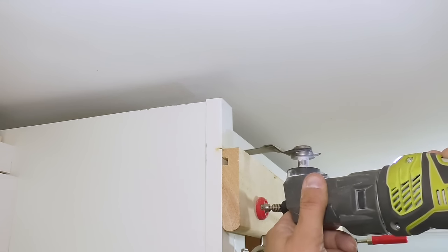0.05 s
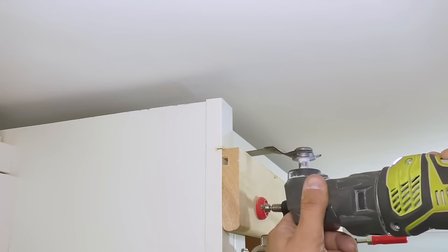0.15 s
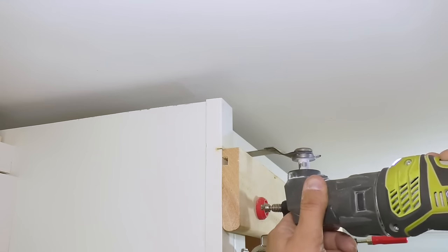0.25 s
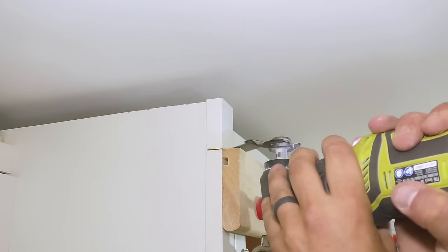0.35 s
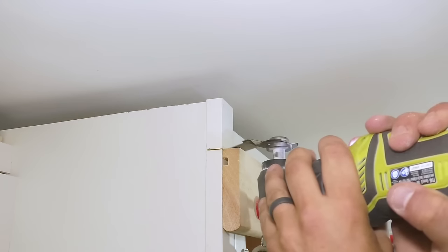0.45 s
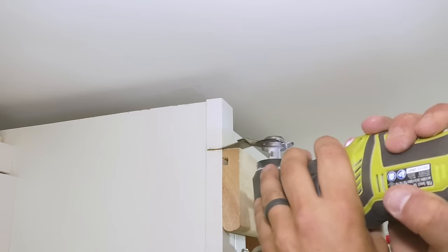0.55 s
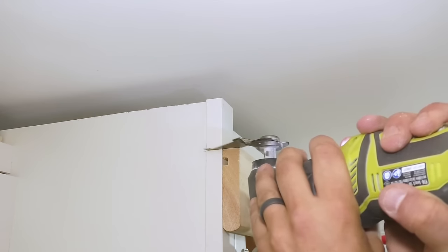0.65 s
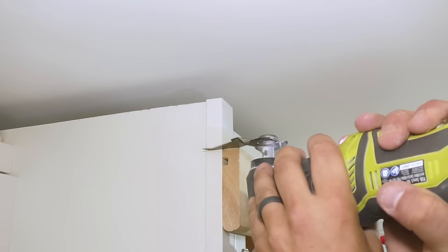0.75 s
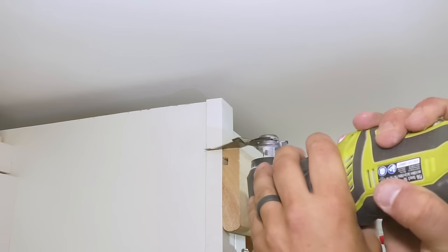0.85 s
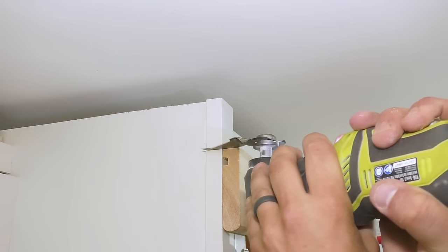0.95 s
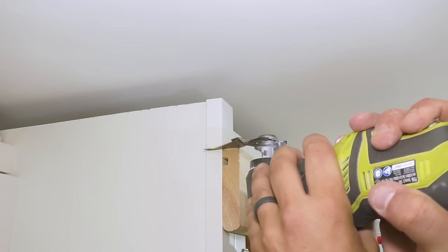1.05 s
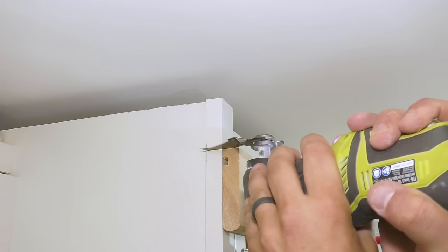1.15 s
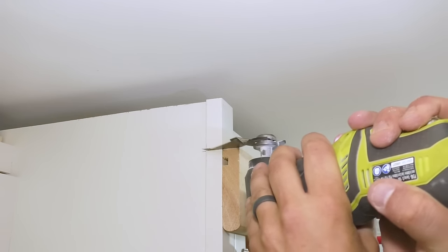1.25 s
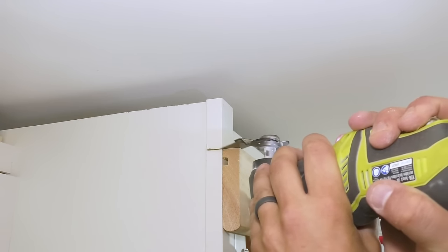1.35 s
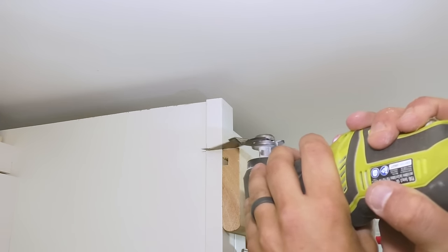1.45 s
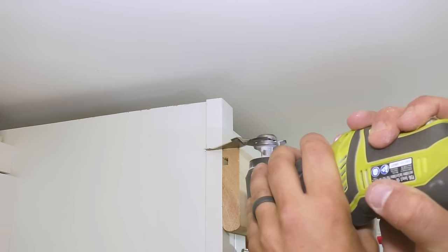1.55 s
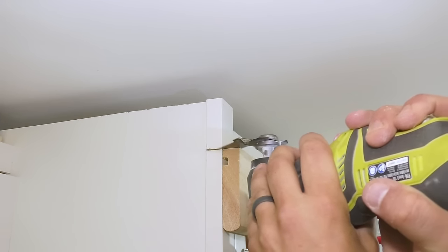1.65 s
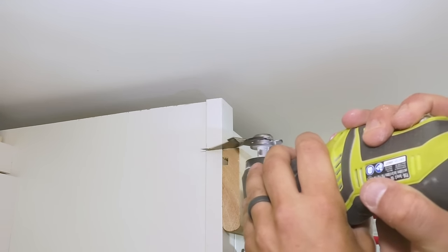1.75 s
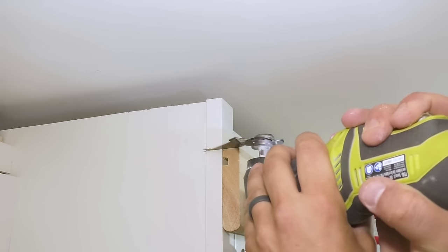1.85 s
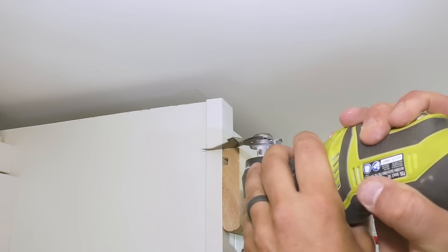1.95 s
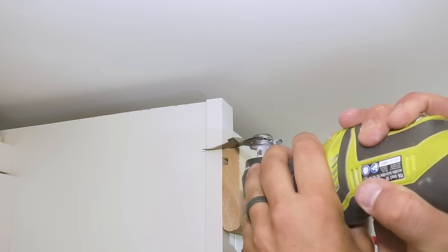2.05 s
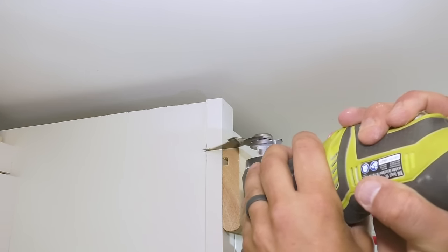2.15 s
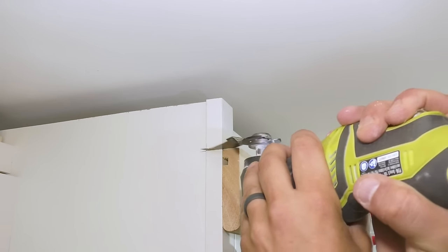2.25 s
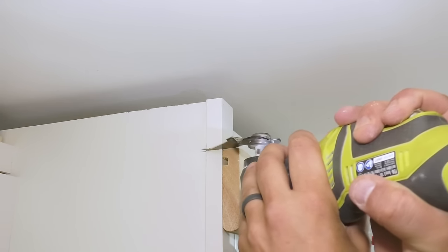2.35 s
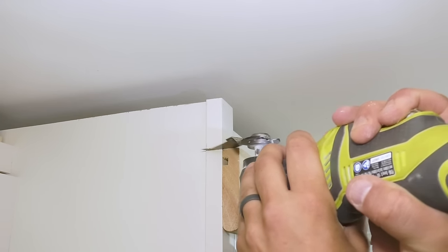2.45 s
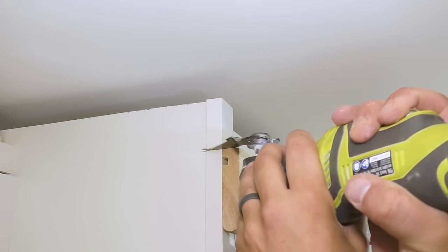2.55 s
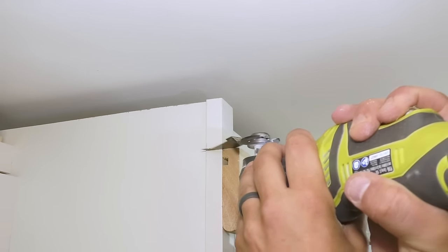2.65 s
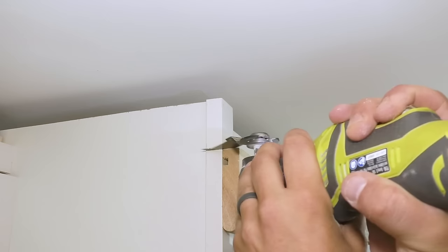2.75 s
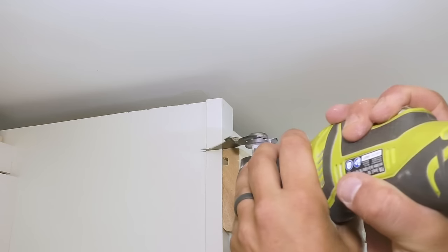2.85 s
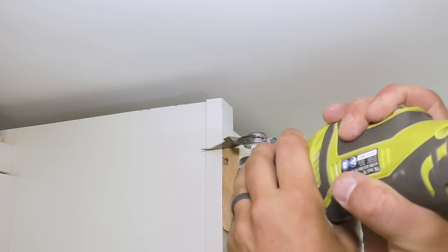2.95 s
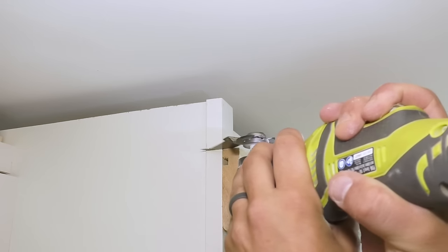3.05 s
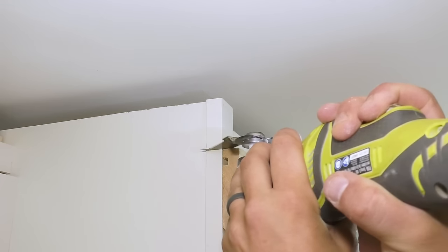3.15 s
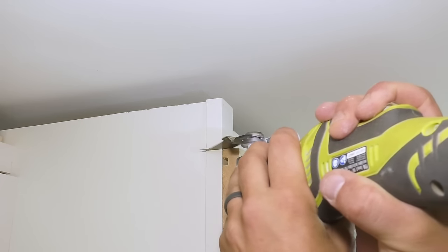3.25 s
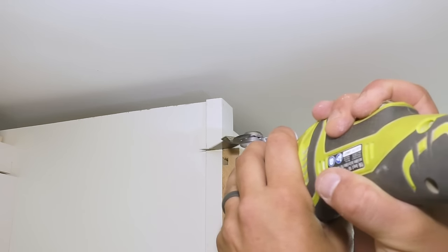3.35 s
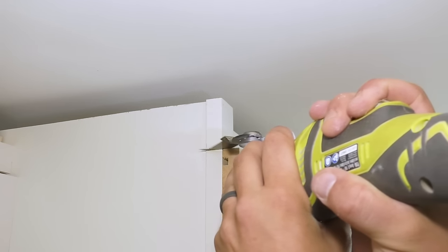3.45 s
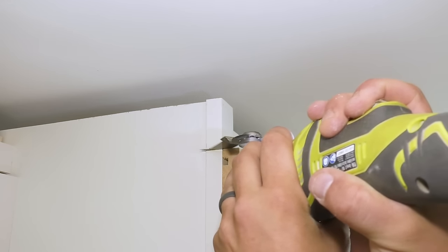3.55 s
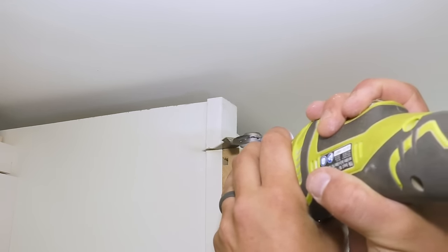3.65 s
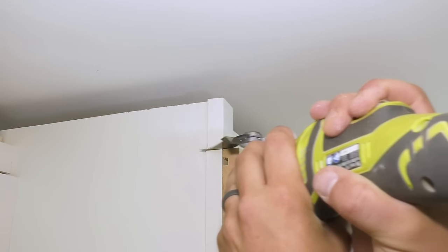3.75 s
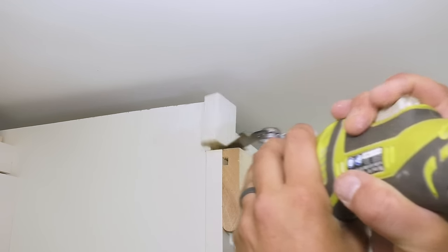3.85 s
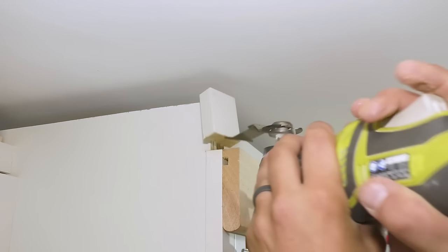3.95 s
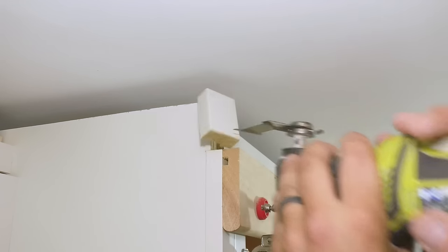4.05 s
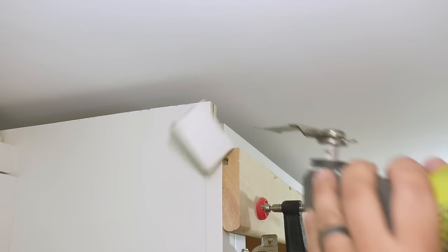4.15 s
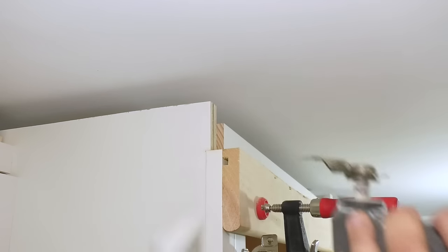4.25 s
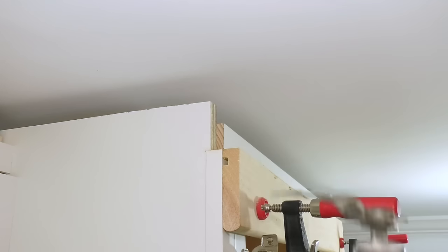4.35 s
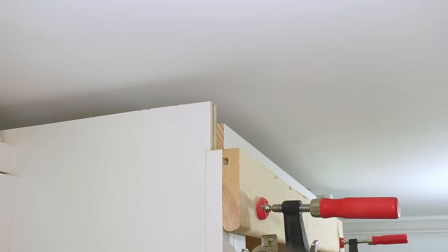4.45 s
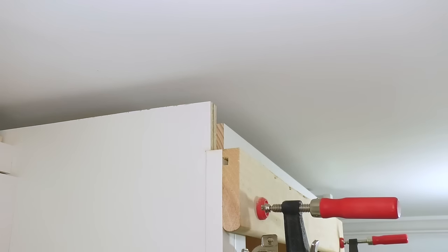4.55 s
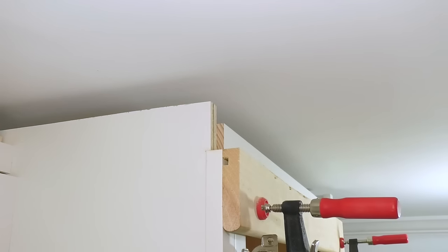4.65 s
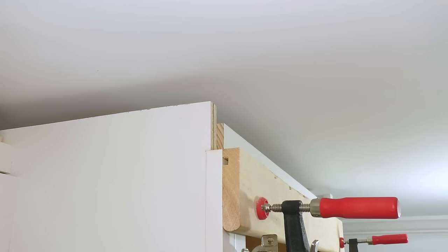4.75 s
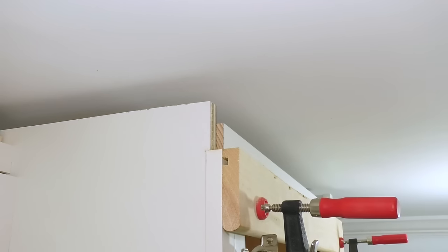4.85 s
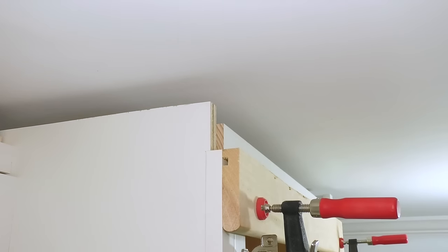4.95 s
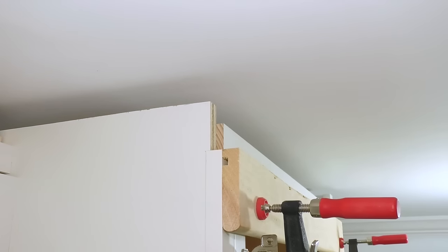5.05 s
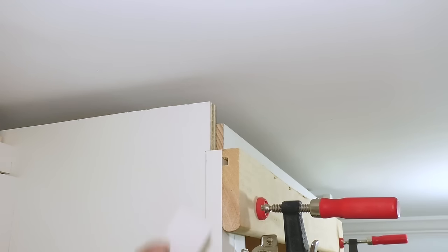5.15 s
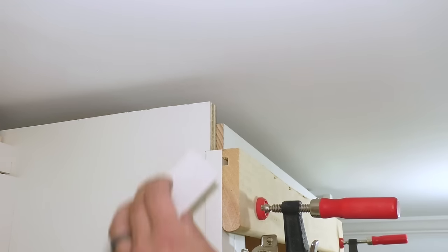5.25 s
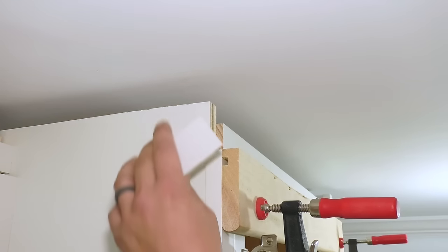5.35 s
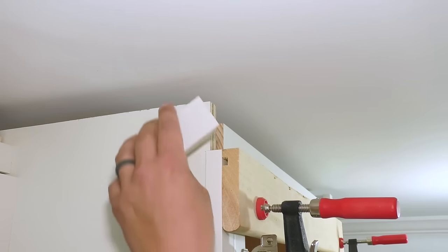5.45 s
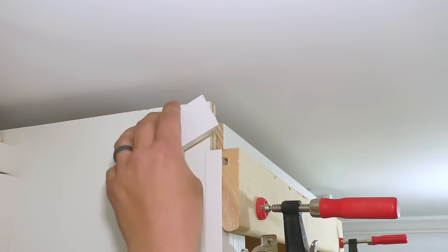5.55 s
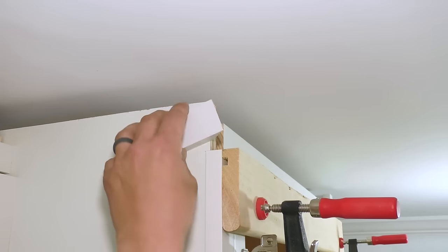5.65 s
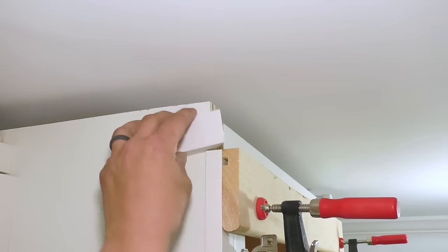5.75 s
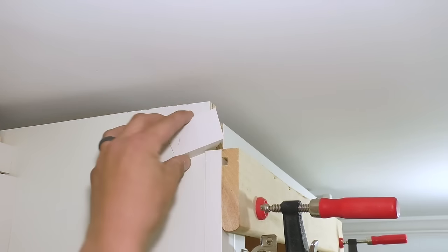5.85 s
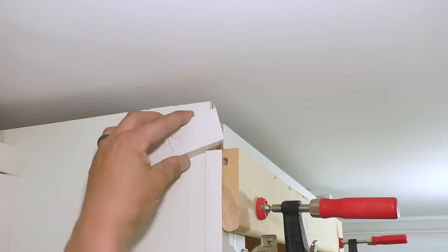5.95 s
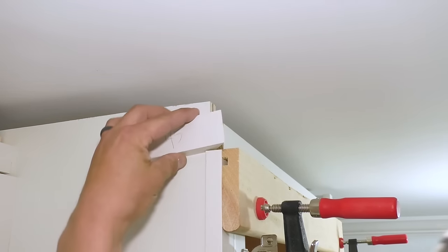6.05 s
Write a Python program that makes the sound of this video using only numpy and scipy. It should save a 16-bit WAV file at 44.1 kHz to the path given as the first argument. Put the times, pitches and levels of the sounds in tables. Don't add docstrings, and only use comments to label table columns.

```python
import sys
import numpy as np
from scipy import signal
from scipy.fft import rfft, irfft
from scipy.io import wavfile
from scipy.ndimage import uniform_filter1d

SR = 44100
rng = np.random.default_rng(int(sys.argv[2]) if len(sys.argv) > 2 else 0)


def master(y):
    cut = np.clip(np.atleast_2d(y).T, -1, 1)
    pcm = np.round(cut * 32767)
    wavfile.write(sys.argv[1], SR, pcm.astype(np.int16))


def volts(x):
    e = np.asarray(x, float) / 20
    return 10 ** e


N = 268995
TIME = np.arange(N) / SR
FULL_CUT_S, LAYING_S = .342, 4.994
STOP_S, SLOW_S, FREE_S = 3.992, 3.925, 3.88
ENTRY = TIME < FULL_CUT_S


def unit(x):
    return x / np.sqrt(np.mean(x ** 2))


def curves(spans):
    s, *columns = np.transpose(np.concatenate(spans))
    return [np.interp(TIME, s, c) for c in columns]


def band(x, lo_hz, hi_hz, order=2):
    return signal.sosfilt(signal.butter(order, [lo_hz, min(hi_hz, .45 * SR)], "band", fs=SR, output="sos"), x)


def hiss(lo_hz, hi_hz):
    return unit(band(rng.standard_normal(N), lo_hz, hi_hz))


def colour(x, points):
    hz, db = np.transpose(points)
    f = np.arange(N // 2 + 1) * SR / N + 1
    return irfft(rfft(x) * volts(np.interp(np.log(f), np.log(hz), db)), N)


def walk(rate):
    k = int(SR / rate)
    levels = rng.standard_normal(N // 100)[:N // k + 1]
    return uniform_filter1d(uniform_filter1d(np.repeat(levels, k), k), k)[:N]


def by_depth(levels, depth):
    return np.interp(depth, np.arange(len(levels)), levels)


def peak(f, centre, width):
    return 1 / (1 + (2 * (f - centre) / width) ** 2)


# centre in Hz, decay by 60 dB in seconds.
DECAY = [(250, 0.47), (1000, 0.44), (3500, 0.43), (11000, 0.3)]


def room(x, wet_db):
    t = TIME[:SR // 2]
    tail = sum(band(rng.standard_normal(len(t)), hz / 2, hz * 2) * 1000. ** (-t / t60) for hz, t60 in DECAY)
    tail = tail * np.clip(t / 0.0073, 0, 1)
    return x + volts(wet_db) * signal.fftconvolve(x, tail / np.sqrt(np.sum(tail ** 2)))[:N]


# time in seconds, swings in Hz, tooth level in dB, chatter from 0 to 1,
# depth from 0 (shallow) to 3 (breaking through).
CUT = [
    [(0.0, 255, -23.5, 0.23, 2.74), (.09, 252.6, -23.5, 0.04, 2.8), (.15, 247.4, -26, 0.48, 1.7),
     (.338, 243.8, -24.5, 0.75, 2.36)],
    [(.346, 264.5, -31, 0.33, -2.5), (.66, 265.1, -26.5, 0.05, 1.5), (.85, 262.5, -28, 0.2, 0.33),
     (1.2, 263.9, -28, 0.33, 0.63), (1.6, 265.3, -28, 0.15, 0.18), (2.5, 266.3, -29.5, 0.01, 1.49),
     (2.68, 265, -28.5, 0, 1.54), (2.76, 263.8, -28, 0.06, 2), (3.28, 261.5, -28.5, 0.15, 2),
     (3.4, 257.4, -26, 0.4, 2.5), (3.79, 258.2, -28, .6, 4), (3.83, 261, -24.5, .2, 0.4),
     (3.9, 263.8, -30.5, 0.32, 0.5), (3.96, 265.6, -32, 0.6, 1.24)],
]
# time in seconds, added chatter from 0 to 1, added boom in dB,
# added octave in dB.
CATCHES = [
    (.5, 0.04, 1.5, 5.5),
    (.94, 0.32, 6, 9.5),
    (1.019, 0.17, 6, -11),
    (1.18, .25, 7.5, 7),
    (1.31, 0.14, 6.5, 8.5),
    (1.49, 0.36, 3, 6.5),
    (1.81, 0.66, 0.5, 7.5),
    (2.731, 0.2, 5, 7),
    (3.58, .1, 3, -4),
    (3.76, 0, 5, 10.5),
]


def blade_motion():
    hz, db, chatter, depth = curves(CUT)
    snag_s = 0.021
    snags = sum(np.outer(row, np.exp(-((TIME - s) / snag_s) ** 2)) for s, *row in CATCHES)
    chatter = chatter + snags[0]
    skip = chatter * np.where(ENTRY, 0.79, 0.33)
    hz = hz * (1 + .0018 * walk(10)) * (1 - 3.5 * np.clip(TIME - SLOW_S, 0, .1))
    phase = 2 * np.pi * np.cumsum(hz) / SR
    return hz, phase, db, chatter, depth, skip, snags[1], snags[2]


# frequency in Hz, level in dB per multiple of the swing rate.
TOOTH_SPECTRUM = [(700, -16.5), (1500, -9.5), (2650, 0), (3500, -6), (4600, -4), (6000, -8.5),
                  (7300, -11.5), (9000, -10)]
# frequency in Hz, then level in dB when the cut is shallow,
# half way, deep and breaking through.
KERF_MODES = [(790, -2, -2, -8, 6), (1107, 8, -1.5, 6.5, -5.5), (1317, 3, 2, -0.5, -1.5),
              (1555, 6, 8, 4.5, 5), (1846, 4.5, 7.5, 7.5, 2), (2164, 8, 4.5, 7, -1.5),
              (2337, 9, -3.5, -18.5, -5), (3160, -11.5, -8, 1.5, -4), (3745, 4.5, 3.5, 5, -12.5),
              (4325, -4, -3, 7, 4), (4980, -20, -2.5, 2, 4.5), (5603, -13, -10, 5.5, -10),
              (6680, -10, -2, -3, -18.5), (7790, -6.5, 5.5, -13, -6.5)]


def tooth_lines(hz, phase, db, chatter, depth, skip):
    tooth_hz, tooth_db = np.transpose(TOOTH_SPECTRUM)
    shaken = phase + 0.093 * chatter * walk(200)
    teeth, halves = 0, 0
    slow = slice(None, None, SR // 200)
    for k in range(3, 35):
        f = k * hz[slow]
        power = volts(np.interp(np.log(f), np.log(tooth_hz), tooth_db)) ** 2
        for mode_hz, *levels in KERF_MODES:
            power = power + (volts(by_depth(levels, depth[slow])) * peak(f, mode_hz, 210)) ** 2
        first = power * volts(-7.5 * np.log2(f / 1000).clip(0)) + (volts(1.5) * peak(f, 1000, 380)) ** 2
        gain = np.interp(TIME, TIME[slow], np.sqrt(np.where(ENTRY[slow], first, power)))
        gain = gain * volts(1.85 * walk(12) + 2.85 * walk(60))
        burst_phase = np.pi / 2 * k ** 2 + 1.16 * walk(9) + 0.41 * walk(70)
        teeth = teeth + gain * np.sin(k * shaken + burst_phase)
        half_phase = k * shaken - phase / 2 + 2.1 * walk(14)
        halves = halves + gain * volts(1.33 * walk(13)) * np.sin(half_phase)
    return volts(db + 2.0 - 3.2 * chatter) * (teeth + skip * halves) / np.std(teeth)


# level in dB of the swing rate when shallow, half way, deep and breaking through.
SWING_BOOM = (-47, -44.5, -34.5, -39)
OCTAVE_BOOM = (-39, -53, -35, -40)


def panel_boom(phase, chatter, depth, skip, snag_db, snag_octave_db):
    swing_db = by_depth(SWING_BOOM, depth) + snag_db + 2.5 * chatter * walk(14)
    octave_db = by_depth(OCTAVE_BOOM, depth) + snag_octave_db + 2.9 * chatter * walk(15) + 1.7 * walk(34)
    boom = volts(swing_db) * np.sin(phase) + volts(octave_db) * np.sin(2 * phase + 0.33 * walk(8))
    skipped = np.sin(phase / 2) + 2.2 * np.sin(phase + phase / 2)
    return np.sqrt(2) * (boom + skip ** 2 * volts(-36.5) * skipped)


# frequency in Hz, density in dB per Hz.
CHIP_SPECTRUM = [(40, -32.5), (110, -23), (220, -26.5), (800, -7.5), (1600, -5.5), (8200, -6), (10000, -12),
                 (15700, -24.5)]
# frequency in Hz, width in Hz, level in dB.
BLADE_MODES = [(1700, 1500, -7), (4060, 600, -6), (5100, 600, -8), (7980, 340, 0), (11200, 130, -14.5)]


def chip_hiss(phase, chatter, depth):
    gate = 1 + 0.21 * np.sin(phase) + 0.59 * np.sin(2 * phase + 1.9)
    grit = rng.standard_normal(N) * volts(1.1 * rng.exponential(1, N)) * gate
    chips = colour(grit, CHIP_SPECTRUM)
    ring = 0
    for hz, width, db in BLADE_MODES:
        mode = unit(band(grit, hz - width / 2, hz + width / 2, order=1))
        ring = ring + volts(db) * mode * volts(3.0 * walk(5))
    chips = chips / np.std(band(chips, 1800, 12000)) + volts(-14.0) * ring
    level_db = -35.5 + 1.6 * chatter + .5 * np.where(ENTRY, 0, depth - 1)
    return chips * volts(level_db + 1.5 * walk(35))


def tearing(phase, db, chatter, skip):
    strokes = np.exp(9.0 * np.cos(phase)) * volts(3.0 * walk(260)) * (1 + skip * np.sin(phase / 2))
    return chatter * volts(db - 2.5) * unit(band(strokes * (1 + 1.1 * hiss(440, 3000)), 350, 2800))


# frequency in Hz, level in dB, ring in seconds.
FREE_MODES = [(6600, -49, .22), (8950, -48.5, .3), (11400, -48.5, .24), (14200, -53, .2)]


def free_blade():
    swell = np.clip((TIME - FREE_S) / .03, 0, 1)
    since_brake = np.clip(TIME - SLOW_S, 0, 1)
    return sum(volts(db) * hiss(hz - 70, hz + 70) * swell * 1000. ** (-since_brake / ring)
               for hz, db, ring in FREE_MODES)


def saw():
    hz, phase, db, chatter, depth, skip, snag_db, snag_octave_db = blade_motion()
    blade = tooth_lines(hz, phase, db, chatter, depth, skip)
    blade = blade + chip_hiss(phase, chatter, depth) + tearing(phase, db, chatter, skip)
    boom = panel_boom(phase, chatter, depth, skip, snag_db, snag_octave_db)
    running = np.clip((STOP_S - TIME) / 0.02, 0, 1)
    return blade * running + free_blade(), boom * running


def knocks(events, modes, crack_hz, body_db, own_db, low_hz, order):
    out, t = np.zeros(N + SR), TIME[:SR // 3]
    for s, db, hz, bright_db, ring in events:
        body = 0
        for mode_hz, mode_db, t60 in modes:
            chance_db, detune = 1.7 * rng.standard_normal(), 0.031 * rng.standard_normal()
            tone = np.sin(2 * np.pi * mode_hz * (1 + detune) * t)
            body = body + volts(mode_db + chance_db) * tone * 1000. ** (-t / min(t60, ring))
        fade = 1000. ** (-t / ring)
        noise = rng.standard_normal(len(t))
        own = np.sin(2 * np.pi * hz * t) * fade
        rattle = unit(band(noise, hz / 2.14, hz * 2.09)) * fade
        dull = volts(body_db) * body / np.max(np.abs(body)) + volts(own_db) * own + 0.42 * rattle
        dull = band(dull, low_hz, 2500, order=order)
        crack = unit(band(noise, *np.multiply(crack_hz, volts(4.5 + 0.51 * bright_db)), order=order)) * fade
        i = int(s * SR)
        out[i:i + len(t)] += volts(db + 1.5) * (dull / np.max(np.abs(dull)) + volts(bright_db) * crack)
    return out[:N]


# start in seconds, peak in dB, pitch in Hz, brightness in dB, ring in seconds.
BOUNCES = [(4.111, -37.5, 390, -34, 0.1), (4.129, -40.5, 535, -20, 0.078), (4.149, -37.5, 435, -26, 0.058),
           (4.179, -54, 532, -22, 0.08), (4.661, -57, 705, -7, 0.09), (4.712, -26, 1540, -1.5, 0.053),
           (4.712, -18.5, 685, -8.5, 0.076), (4.749, -17.5, 904, -34, 0.11), (4.755, -20, 1000, -40, 0.08),
           (4.764, -26, 770, -38, 0.11), (4.779, -17.5, 510, -43, 0.052), (4.799, -21, 800, -43, 0.12),
           (4.852, -28, 1260, -36, 0.18), (4.893, -17.5, 1380, -15, 0.071), (4.904, -18, 1390, -14, 0.13),
           (4.939, -24, 770, -21, 0.077), (4.959, -29, 1320, -27, 0.083)]
# frequency in Hz, level in dB, ring in seconds.
FLOOR_MODES = [(484, -1.5, 0.15), (786, -4, 0.11), (885, -19, 5.0), (1120, -5, 0.34), (1224, -8, 0.87),
               (1362, -15, 5.0), (2220, -8, 0.57), (2330, -11, 5.0)]


def falling_block():
    return knocks(BOUNCES, FLOOR_MODES, (2200, 7000), -8.5, -9.5, 290, order=3)


# start in seconds, peak in dB, pitch in Hz, brightness in dB, ring in seconds.
CONTACTS = [(5.256, -37, 523, -46, 0.064), (5.262, -34.5, 265, -35, 0.25), (5.274, -46, 555, -21, 0.066),
            (5.673, -34.5, 302, -19, 0.071), (5.678, -32, 389, -23, 0.61), (5.714, -14.5, 883, -48, 0.1),
            (5.727, -18.5, 372, -35, 0.043), (5.737, -15, 810, -24, 0.056),
            (5.747, -19.5, 770, -21.5, 0.09), (5.779, -33, 840, -29, 0.045),
            (5.833, -23.5, 816, -25, 0.054), (5.847, -25.5, 387, -34, 0.11), (5.859, -32, 754, -32, 0.08),
            (5.908, -26.5, 624, -24, 0.12), (5.929, -28, 404, -45, 0.06), (5.944, -37.5, 370, -30, 0.08)]
# frequency in Hz, level in dB, ring in seconds.
CABINET_MODES = [(369, 16, 0.18), (610, 4, 0.17), (770, 13.5, 0.12), (910, -21, 0.28), (1075, 1, 0.19),
                 (1460, 7, 0.22), (1610, -16, 0.28), (1830, -13, 0.068), (2056, -32, 0.58),
                 (2760, -20, 0.063)]


def laid_block():
    return knocks(CONTACTS, CABINET_MODES, (2900, 6000), -9.0, -8.5, 200, order=4)


# start in seconds, peak in dB, frequency in Hz, ring in seconds.
BUMPS = [(4.13, -47, 282, 0.1), (4.19, -54, 170, 0.093), (4.091, -52, 99, 0.077), (4.277, -47.5, 109, 0.05),
         (4.38, -60, 62.25, 0.064), (4.719, -25, 131, 0.046), (4.799, -37, 75.4, 0.079),
         (5.259, -40, 80, 0.07), (5.299, -35, 61.9, 0.077), (5.337, -30, 75.4, 0.057),
         (5.735, -36.5, 193, 0.095), (5.918, -40, 82.4, 0.079)]


def thuds():
    out = 0
    for s, db, hz, ring in BUMPS:
        t = np.clip(TIME - s, 0, 1)
        out = out + volts(db) * np.sin(2 * np.pi * hz * t) * 1000. ** (-t / ring / 2) * (1 - np.exp(-t / 0.0052))
    return out


# start in seconds, peak in dB, pitch in Hz, brightness in dB.
CLICKS = [(4.299, -62, 2700, -11.5), (4.36, -65, 2530, -3), (4.389, -55, 751, -26),
          (4.481, -46.5, 740, -25), (4.497, -50, 2340, -11.5), (4.568, -58.5, 603, -17),
          (4.644, -55, 750, -10.5), (5.022, -46, 690, -11), (5.053, -41, 600, -13), (5.071, -45, 786, -5),
          (5.108, -41.5, 580, -8), (5.176, -39, 617, -13), (5.303, -32, 577, -9), (5.834, -30, 810, -23),
          (5.908, -40, 636, -31)]


def ticks():
    out, t = np.zeros(N + SR), TIME[:SR // 20]
    for s, db, hz, bright_db in CLICKS:
        noise = unit(band(rng.standard_normal(len(t)), 1400, 7600, order=4))
        snap = volts(bright_db) * noise * np.exp(-t / 0.0017)
        i = int(s * SR)
        out[i:i + len(t)] += volts(db) * (np.sin(2 * np.pi * hz * t) * np.exp(-t / 0.0027) + snap)
    return out[:N]


# time in seconds, rise in seconds, fall in seconds,
# rubbing in dB, dust hiss in dB.
STROKES = [(4.5, .004, 0.68, -70.5, -86), (4.652, .006, 0.56, -61.5, -76.5), (5.0, .004, .2, -61.5, -70),
           (5.135, 0.073, 0.079, -59, -75), (5.278, .015, 0.16, -55, -50.5), (5.4, 0.018, 0.13, -57, -59),
           (5.448, .08, 0.13, -57, -53), (5.5, .08, 0.085, -55, -63), (5.63, .008, .12, -55, -57.5),
           (5.718, .005, 0.13, -47, -60), (5.91, 0.023, .08, -68, -64), (6.05, 0.081, .1, -60, -75)]
# rubbing in dB,
# dust hiss in dB, rumble in dB.
BACKGROUND = [(-76.5, -83, -75), (-60, -74.5, -60.5)]


def hand():
    before = TIME < LAYING_S
    rub, dust, rumble = np.where(before, *volts(np.array(BACKGROUND))[:, :, None])
    for s, rise, fall, rub_db, dust_db in STROKES:
        shape = 0.072 ** np.where(TIME < s, (s - TIME) / rise, (TIME - s) / fall)
        shape = shape * (before == (s < LAYING_S))
        rub, dust = rub + volts(rub_db) * shape, dust + volts(dust_db) * shape
    rumble = rumble + volts(-14) * rub
    grains = rng.standard_normal(N) * volts(1.1 * rng.exponential(1, N))
    dust_noise = unit(colour(grains, [(1500, -9), (3500, 2.5), (8000, -0.5), (15500, -11.5)]))
    rub = rub * volts(2.0 * walk(40)) * hiss(200, 2180)
    dust = dust * volts(2.0 * walk(50)) * dust_noise
    rumble = rumble * volts(4.5 * walk(15)) * hiss(43.0, 266)
    return (rub + dust + rumble) * (TIME > STOP_S)


def scene():
    blade, boom = saw()
    before = np.where(ENTRY, room(blade, -8.0), room(blade * (TIME > FULL_CUT_S), -7.5))
    before = before + room(boom, -17.5) + room(falling_block(), -6.5)
    after = room(laid_block(), -8.5)
    mono = np.where(TIME < LAYING_S, before, after) + hand() + thuds() + room(ticks(), -10.0)
    side = volts(-27.0 + 6.0 * walk(20)) * band(np.roll(mono, shift=97), 6000, 12400, order=4)
    return np.array([mono + side, mono - side])


def top_cut(x):
    return signal.sosfilt(signal.butter(12, 16360, fs=SR, output="sos"), x)


# time in seconds, level.
CONVERTER_OFFSET = [(0, 0.0011), (3.95, 0.0015), (4.3, 0.004), (4.7, .0042), (4.72, 0.0024),
                    (4.994, 0.0027), (4.9942, 0.015), (6.1, .0152)]


def record(dry):
    rounded = .3 * np.tanh(dry / .3)
    limited = signal.sosfilt(signal.ellip(8, .2, 60, 15770, fs=SR, output="sos"), rounded)
    return top_cut(limited + np.interp(TIME, *np.transpose(CONVERTER_OFFSET)))


dry = scene()
out = record(dry)
master(out)
```